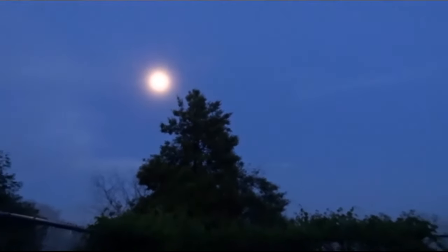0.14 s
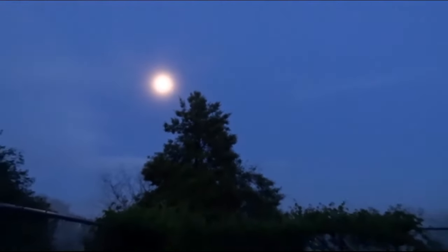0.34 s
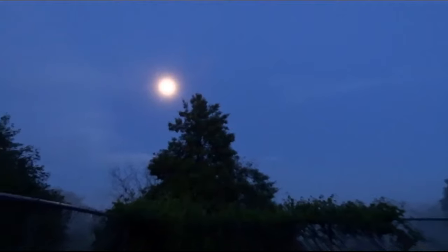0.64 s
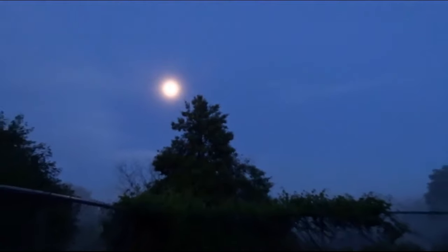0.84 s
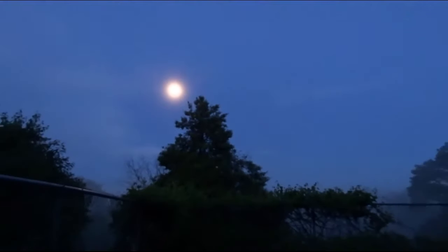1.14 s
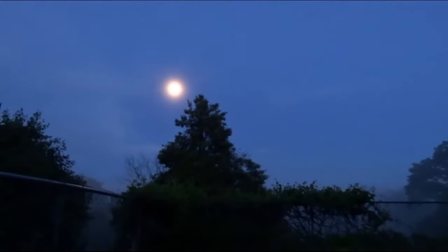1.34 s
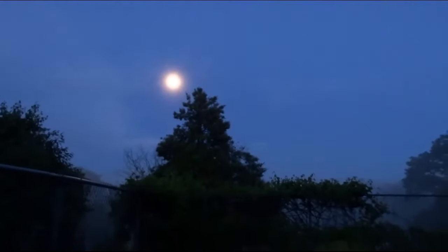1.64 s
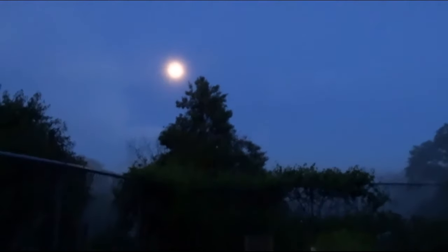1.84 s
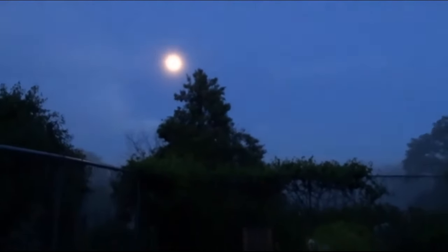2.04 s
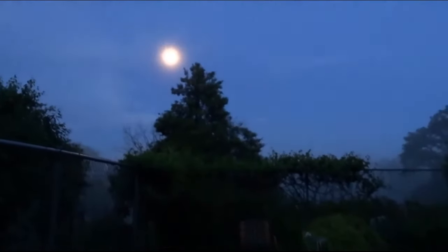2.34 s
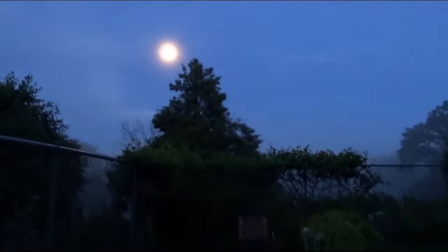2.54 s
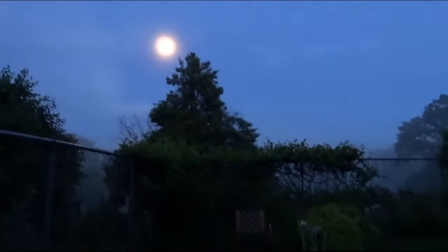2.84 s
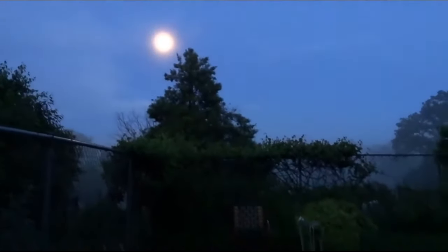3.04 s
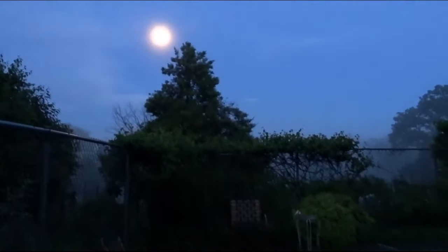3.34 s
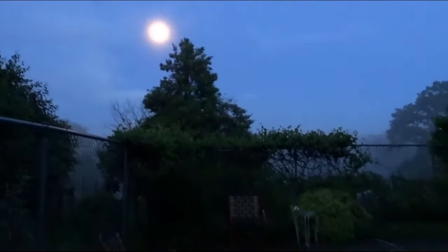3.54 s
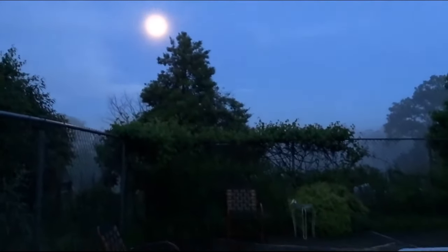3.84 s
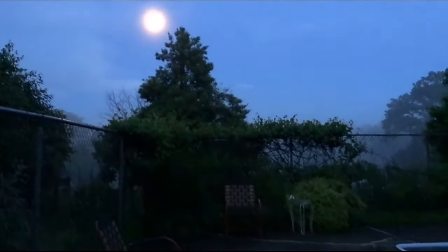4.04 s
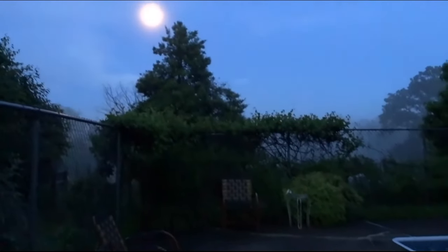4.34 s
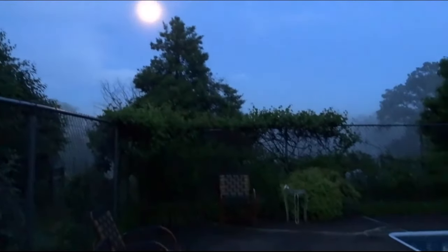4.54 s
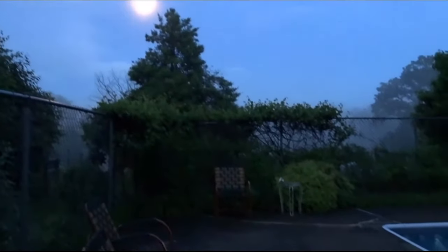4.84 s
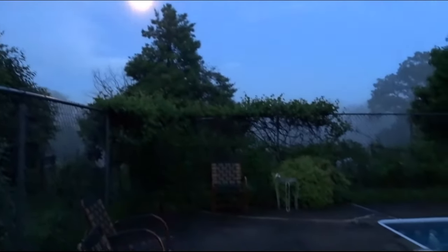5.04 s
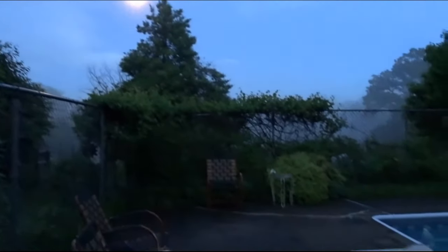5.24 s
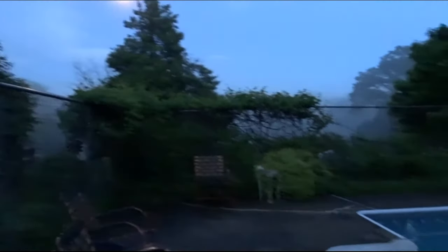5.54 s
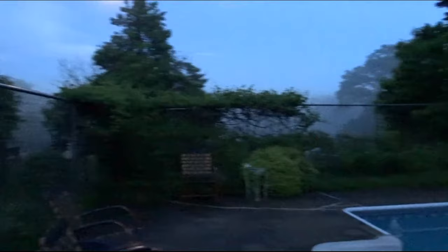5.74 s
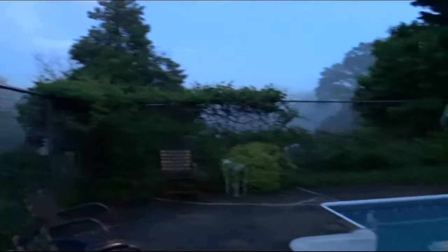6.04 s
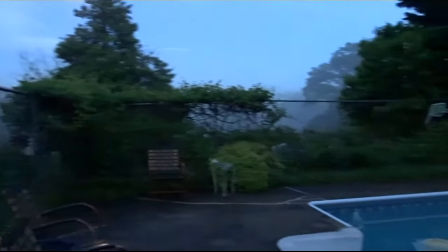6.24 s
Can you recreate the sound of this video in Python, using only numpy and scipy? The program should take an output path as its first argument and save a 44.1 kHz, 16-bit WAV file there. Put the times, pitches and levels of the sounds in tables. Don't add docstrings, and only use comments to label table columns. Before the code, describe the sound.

A pond chorus of tree toads trills in a misty backyard, mostly to the left, with nearer callers swelling around the middle. Crickets pulse rapidly above with a thin rasp and sharp insect ticks. Quiet road hum throbs below. A handheld camera's zoom motor whirs faintly for the first second and a half, then fingers rub and click its plastic body; one dry click comes near the end.

```python
import sys
import numpy as np
from scipy import signal
from scipy.io import wavfile
from scipy.ndimage import uniform_filter1d

SR = 44100
rng = np.random.default_rng(int(sys.argv[2]) if len(sys.argv) > 2 else 0)


def wav_out(sig):
    wavfile.write(sys.argv[1], SR, np.round(np.clip(np.atleast_2d(sig).T, -1, 1) * 32767).astype(np.int16))


def elevation(decibels):
    levels = np.asarray(decibels, float)
    return 10 ** (levels / 20)


N = 281358


def evened(x):
    return x / np.sqrt(np.mean(x ** 2) + 1e-20)


def read(points, hz):
    f, value = np.transpose(points)
    return np.interp(np.log(hz + 1), np.log(f + 1), value)


def curves(rows):
    s, *columns = np.transpose(rows)
    return [np.interp(np.arange(N) / SR, s, column) for column in columns]


def add(mix, s, sound):
    part = mix[max(round(s * SR), 0):][:len(sound)]
    part += sound[:len(part)]


def held(rows, edge_s):
    t = np.arange(N) / SR
    gain = sum(elevation(db) * (t >= start) * (t < end) for start, end, db in rows)
    return uniform_filter1d(gain, max(int(edge_s * SR), 1))


# pitch_hz, likeness (1 = mono)
STEREO_LIKENESS = [(60, 1), (170, 0.96), (470, 0.59), (1330, 0.62), (3740, 0.47), (10500, 0.64)]
# pitch_hz, left_over_right_db
STEREO_LEAN = [(60, .2), (170, 0.76), (470, 2.2), (1330, 0.88), (3740, 0.98), (10500, 0.39)]


def noise(shape_db, patchy_db):
    frames, hz = N // 512 + 5, np.fft.rfftfreq(2048, 1 / SR)[:, None]
    a, b, c, d, patches = rng.standard_normal((frames, 1025, 5)).T
    patches = evened(uniform_filter1d(uniform_filter1d(patches, 16, 0), 6, 1))
    same = np.clip(read(STEREO_LIKENESS, hz), -1, 1)
    lean = elevation(read(STEREO_LEAN, hz) / 2)
    left = a + 1j * b
    right = same * left + np.sqrt(1 - same ** 2) * (c + 1j * d)
    z = np.array([left * lean, right / lean])
    z *= elevation(shape_db(hz, np.arange(frames) * 512 / SR) + patchy_db * patches)
    return evened(signal.istft(z, nperseg=2048, noverlap=1536)[1][:, :N])


def wavering(hz, width):
    drift = signal.lfilter([1], [1, -np.exp(-np.pi * width / SR)], rng.standard_normal((2, N)))
    turn = 2 * np.pi * hz * np.arange(N) / SR
    return evened((1.83 + evened(drift[0])) * np.cos(turn) + evened(drift[1]) * np.sin(turn))


def yard(x, wet_db, t60):
    t = np.arange(SR // 3) / SR
    signs = rng.choice([-1., 1.], (2, len(t)))
    sparse = rng.random((2, len(t))) < .05
    taps = signs * sparse * elevation(-60 * t / t60) * (t > .002)
    echoes = signal.fftconvolve(x[None], taps / np.linalg.norm(taps[0]), axes=1)[:, :N]
    return x + elevation(wet_db) * echoes


def pulses(count, centre_hz, glide, duty, rough, uneven_db, step=1):
    u = np.clip((count % 1) / duty, 0, 1)
    k = count.astype(int) - int(count.min())
    size, pitch = rng.standard_normal((400, 2)).T
    hz = centre_hz * (1 + glide * (u - .5) + rough * pitch[k])
    envelope = np.sin(np.pi * u ** 1.185) ** 2 * elevation(uneven_db * size[k])
    return 2 * np.pi * np.cumsum(hz) * step / SR, envelope


# pitch_hz, level_db per Hz
AIR_COLOUR = [(700, -32), (1000, 14.5), (1500, -0.5), (1750, 4), (2800, -1.5), (3600, -3), (5200, -7.5),
              (6500, -16.5), (9500, -15), (11000, -20)]


def air():
    return elevation(-59.5) * noise(lambda hz, t: read(AIR_COLOUR, hz) + 0 * t, patchy_db=3.0)


# pitch_hz, level_db per Hz
ROAD_COLOUR = [(34, -51), (58, 2), (70, -7.5), (124, -0.5), (157, -6.5), (242, -7.5), (269, -18),
               (302, -12.5), (377, -18.5), (536, -15.5), (609, -9), (835, -10), (950, -22.5), (1240, -30),
               (2090, -120)]
# time_s, level_db
ROAD_SWELL = [(0, -59.5), (1.3, -58), (2.5, -58), (4, -58), (4.6, -57), (5.8, -56), (6.38, -60)]
# pitch_hz, width_hz, level_db
MACHINES = [(113.5, 6.2, -66), (240, 9.1, -75)]


def traffic():
    car_s, car_width_s, car_db = 1.43, .48, 3.5
    throb_db, lull_db = -59.5, -8.5

    def colour(hz, t):
        passing = np.exp(-((t - car_s) / car_width_s) ** 2)
        return read(ROAD_COLOUR, hz) + (hz > 450) * car_db * passing

    hum = elevation(curves(ROAD_SWELL)[0] + 1.5) * noise(colour, patchy_db=1.46)
    coasting = held([(2.75, 4.3, 0)], edge_s=.2)
    throb = elevation(throb_db + lull_db * coasting) * wavering(47, width=2.2)
    machines = sum(elevation(db) * wavering(hz, width) for hz, width, db in MACHINES)
    rumble_cut = signal.butter(3, 36, "high", fs=SR, output="sos")
    return signal.sosfilt(rumble_cut, hum + throb + machines)


# start_s, end_s, level_db
WHISTLES = [
    (.02, .2, -76),
    (.66, .83, -75),
    (1.7, 1.95, -76),
    (2.42, 2.64, -74.5),
]


def whistler():
    return held(WHISTLES, edge_s=.06) * wavering(3250, width=12)


# start_s, end_s, level_db
MOTOR_RUNS = [
    (0, 1.532, -68.5),
    (1.645, 1.7, -69),
    (1.7, 1.73, -66.5),
    (1.73, 1.79, -63.5),
    (1.812, 1.882, -67.5),
]
# pitch_hz, level_db per Hz
HOUSING_COLOUR = [(300, -27), (1500, -9), (3000, -14.5), (5100, -15.5), (5800, -13.5), (6300, -17),
                  (6950, -9), (7150, -7), (7450, -21), (7650, -7.5), (7970, -3), (8500, -18), (9300, -18.5),
                  (10200, -16), (11000, -29)]


def motor():
    whir = noise(lambda hz, t: read(HOUSING_COLOUR, hz) + 0 * t, patchy_db=.5)
    whir *= elevation(2.55 * evened(uniform_filter1d(rng.standard_normal(N), 150)))
    return elevation(4.5) * held(MOTOR_RUNS, edge_s=0.0069) * whir


# start_s, peak_db, low_part_db
BUTTON_CLICKS = [
    (1.4034, -66, -62),
    (1.5314, -64, -66),
    (1.6467, -47, -58),
    (1.6746, -54, -50),
    (1.8208, -53, -60),
    (1.8397, -55, -62),
    (1.8711, -47, -57),
    (5.854, -57, -75),
]


def clicks():
    taps, u = np.zeros(N), np.arange(1300) / SR
    snap_band = signal.butter(1, (2500, 9500), "band", fs=SR, output="sos")
    rattle_band = signal.butter(2, (2700, 4200), "band", fs=SR, output="sos")
    for s, db, low_db in BUTTON_CLICKS:
        snap, rattle = rng.standard_normal((len(u), 2)).T
        snap = signal.sosfilt(snap_band, snap) * elevation(db + 1.5 - 60 * u / .012)
        rattle = signal.sosfilt(rattle_band, rattle) * elevation(low_db + 12 - 60 * u / 0.091)
        add(taps, s, snap + rattle)
    return taps


# start_s, peak_db, pitch_hz
BODY_KNOCKS = [
    (1.348, -44, 790),
    (1.403, -41, 780),
    (1.638, -42, 760),
    (1.751, -42.5, 790),
]


def knocks():
    taps, u = np.zeros(N), np.arange(1300) / SR
    for s, db, hz in BODY_KNOCKS:
        tones = np.sin(2 * np.pi * hz * u) + .4 * np.sin(2 * np.pi * .78 * hz * u)
        add(taps, s, elevation(db + 5.5 - 60 * u / .035) * tones * np.minimum(u / .003, 1))
    return taps


# time_s, level_db
FAR_CRICKETS = [(0, -60), (1.5, -58), (3, -56.5), (4, -57), (5, -55), (6.38, -58)]


def far_crickets(count=24, step=2):
    t, group = np.arange(0, N, step) / SR, 0
    for pitch in np.linspace(-1.5, 1.5, count):
        rate, start = rng.random(2)
        phase, shape = pulses(start + t * (30 + 12 * rate), 4300 * (1 + .08 * pitch),
                              glide=-.11, duty=0.49, rough=.02, uneven_db=1.0, step=step)
        group = group + shape * np.sin(phase) * elevation(-8 * pitch ** 2)
    return elevation(curves(FAR_CRICKETS)[0] - 1.5) * evened(signal.resample_poly(group, step, 1)[:N])


# start_s, peak_db, pitch_hz
INSECT_TICKS = [(2.839, -54, 4870), (3.0024, -47, 4816), (3.7361, -46, 4815), (3.8119, -49, 4660),
                (3.8726, -47, 4607), (3.921, -43, 4700), (4.089, -45, 4795), (4.2754, -42, 4700),
                (4.3815, -45, 4800), (4.4396, -49, 4864), (4.4969, -60, 4676), (4.606, -38, 4640),
                (4.6338, -57, 4680), (4.6913, -43, 4740), (4.9453, -48, 4860), (5.3109, -46, 4800)]


def ticks():
    song, u = np.zeros(N), np.arange(300) / 300
    for s, db, hz in INSECT_TICKS:
        phase = 2 * np.pi * np.cumsum(hz * (.97 + .08 * u)) / SR
        add(song, s, elevation(db - 6) * np.sin(np.pi * u) * np.sin(phase))
    return song


# start_s, end_s, strokes_per_s
BOUTS = [
    (.014, .802, 36.8),
    (.802, 1.586, 35.7),
    (1.586, 3.27, 35.32),
    (3.448, 3.668, 36.3),
    (3.668, 4.297, 36.6),
    (4.297, 5.418, 35.67),
    (5.418, 6.2, 36.3),
]
BOUT_DB = [-63, -63, -59.5, -58.5, -64, -56.5, -56]


def near_cricket():
    song, beat = np.zeros((2, N))
    for (first, end, rate), db in zip(BOUTS, BOUT_DB):
        count = rate * np.arange(0, end - first, 1 / SR)
        phase, shape = pulses(count, 4310, glide=-.16, duty=.5, rough=.006, uneven_db=.8)
        add(song, first, elevation(db + 11) * shape * np.sin(phase))
        add(beat, first, shape)
    return song, beat


# pitch_hz, level_db per Hz
RASP_COLOUR = [(5000, -28), (7300, -9), (8000, -2.5), (8450, 6), (8750, 3), (9100, -19.5), (11000, -56)]


def wing_rasp(beat):
    spans = [(first, end, -69.5 + .5 * (db + 60)) for (first, end, _), db in zip(BOUTS, BOUT_DB)]
    effort = held(spans, edge_s=.03)
    rasp = noise(lambda hz, t: read(RASP_COLOUR, hz) + 0 * t, patchy_db=2.1)
    return elevation(-3.5) * rasp * (effort * (1 + 0.7 * beat) + elevation(-83))


def crickets():
    near, beat = near_cricket()
    song = yard(far_crickets() + near + ticks(), wet_db=-9.5, t60=0.3)
    return song * elevation(np.array([[1.2], [-1.2]])) + wing_rasp(beat)


def toads_side():
    return elevation(5.2 * np.array([[.5], [-.5]]))


# time_s, upper_partial_db, lower_over_upper_db, upper_pitch_hz
CHORUS = [(0.0, -55.5, -5, 2120), (0.05, -55.5, -19, 2090), (0.51, -53, -11.5, 2134),
          (1.67, -52.5, -4, 2121), (1.79, -49.5, -5, 2134), (2.7, -50.5, -4.5, 2114),
          (3.02, -48.5, -8, 2139), (4.03, -50, -14, 2185), (4.6, -46.5, -8.5, 2098),
          (6.06, -55.5, -8, 2157), (6.38, -50.5, -2.5, 2159)]


def far_toads(count=44, step=4):
    upper_db, lower_db, upper_hz = curves(CHORUS)
    t, partials = np.arange(0, N, step) / SR, 0
    for pitch in np.linspace(-1.6, 1.6, count):
        rate, start, cycle, bout = rng.random(4)
        hz = upper_hz[::step] / 2 * (1 + .088 * pitch)
        phase, shape = pulses(start + t * (16.5 + 4 * rate), hz,
                              glide=.12, duty=.42, rough=.015, uneven_db=1.5, step=step)
        shape *= np.clip(1.25 + np.sin(2 * np.pi * (bout + t * (0.2975 + 0.309 * cycle))), 0, 1)
        voice_db = np.array([[-3.5 * (pitch - .3) ** 2], [-8 * pitch ** 2], [-22 * pitch ** 2]])
        voice_db = voice_db + 0.6 * rng.standard_normal((3, 1))
        partials = partials + elevation(voice_db) * shape * np.sin(np.outer([1, 2, 3], phase))
    lower, upper, third = (evened(p[:N]) for p in signal.resample_poly(partials, step, 1, axis=1))
    call = elevation(upper_db - 3.0) * (upper + elevation(lower_db - 2.0) * lower + elevation(-29.5) * third)
    return yard(call, wet_db=-8, t60=0.27) * toads_side() * elevation(2.0)


# first_pulse_s, end_s, pulses_per_s, upper_pitch_hz, level_db
TRILLS = [(0.014, .55, 19.72, 2200, -55), (.641, 1.42, 18.56, 2140, -54), (1.641, 2.1, 18.52, 2150, -45),
          (2.14, 2.8, 17.66, 2170, -50), (2.806, 3.64, 19.8, 2110, -41.5), (3.676, 4.2, 19.34, 2190, -45),
          (4.189, 4.98, 18.76, 2140, -41.5), (4.47, 5.32, 18.15, 1960, -47), (5.3, 6.05, 17.5, 1780, -57),
          (5.35, 5.8, 19.2, 2180, -48), (5.845, 6.38, 18.72, 2170, -48)]


def near_toads():
    upper, lower = np.zeros((2, N))
    for first, end, rate, upper_hz, db in TRILLS:
        lead = .22 / rate
        t = np.arange(0, end - first + lead, 1 / SR)
        phase, shape = pulses(t * rate, upper_hz / 2, glide=.16, duty=.42, rough=.012, uneven_db=1.5)
        shape = shape * signal.windows.tukey(len(t), .2)
        add(upper, first - lead, shape * elevation(db) * (np.sin(2 * phase) + elevation(-26) * np.sin(3 * phase)))
        add(lower, first - lead, shape * np.sin(phase))
    chorus_db, lower_db, _ = curves(CHORUS)
    call = upper + elevation(chorus_db + lower_db + 1) * lower
    return yard(call, wet_db=-10, t60=0.3) * toads_side()


def scene():
    camera = motor() + clicks() + knocks()
    return air() + traffic() + whistler() + camera + crickets() + far_toads() + near_toads()


def top_cut(x):
    return signal.sosfilt(signal.butter(12, 11100, fs=SR, output="sos"), x)


def record(dry):
    settled = dry * elevation(-4 * np.exp(-np.arange(N) / SR / 0.047))
    lowpass = signal.firwin(511, 11150, window=("kaiser", 9), fs=SR)
    limited = signal.oaconvolve(settled, lowpass[None], "same")
    return top_cut(limited)


dry = scene()
out = record(dry)
wav_out(out)
```